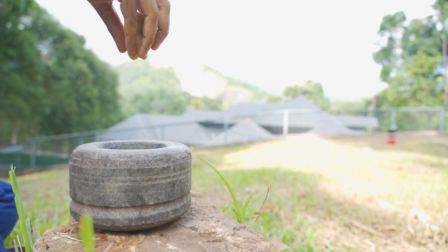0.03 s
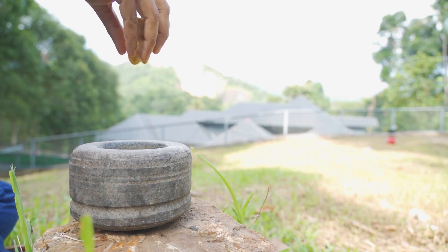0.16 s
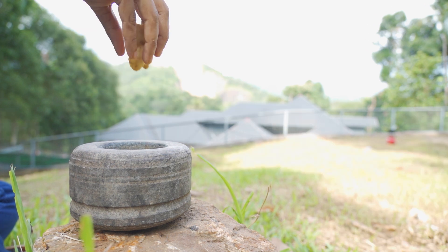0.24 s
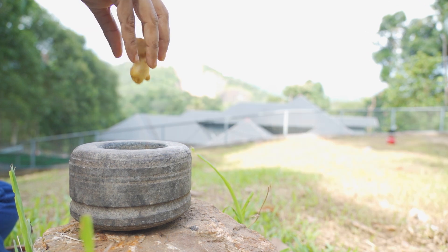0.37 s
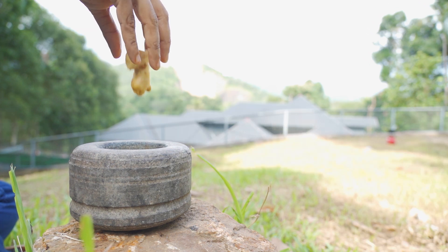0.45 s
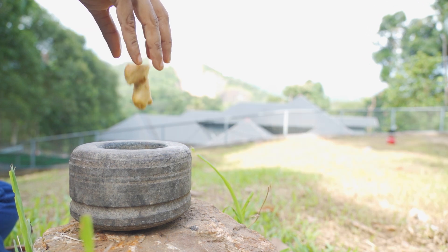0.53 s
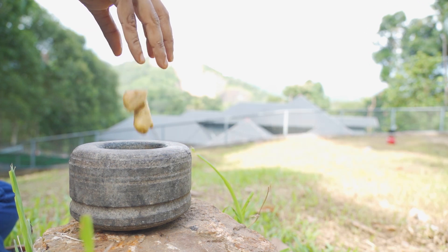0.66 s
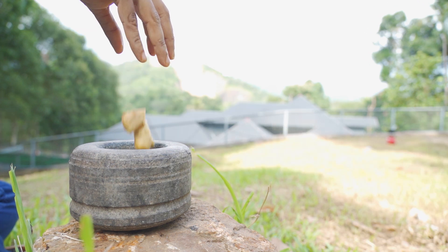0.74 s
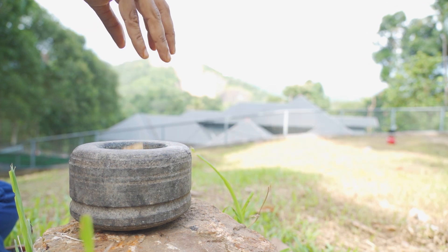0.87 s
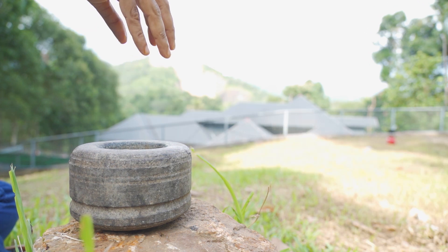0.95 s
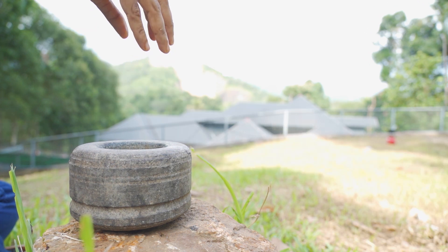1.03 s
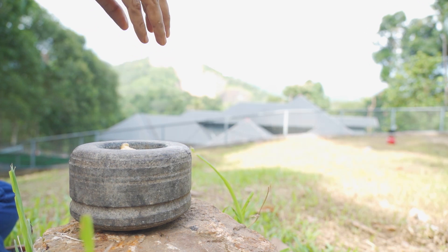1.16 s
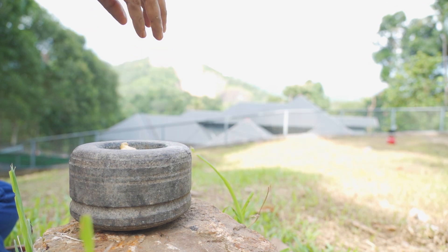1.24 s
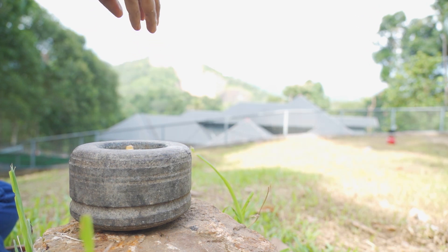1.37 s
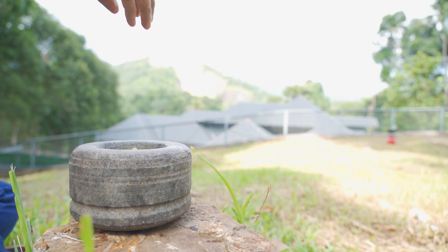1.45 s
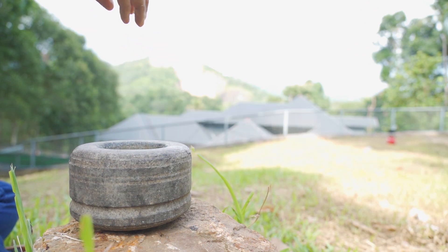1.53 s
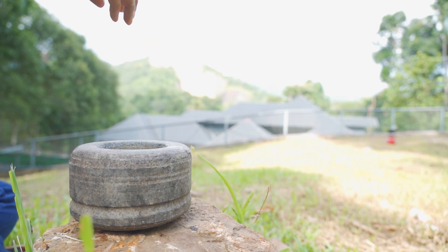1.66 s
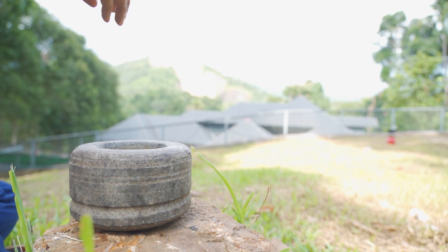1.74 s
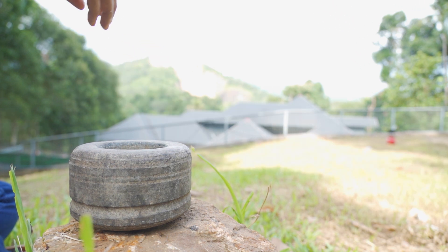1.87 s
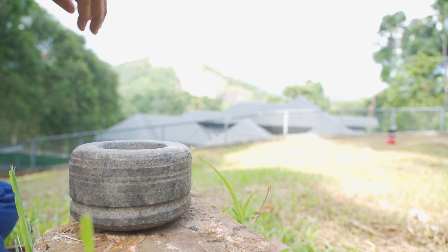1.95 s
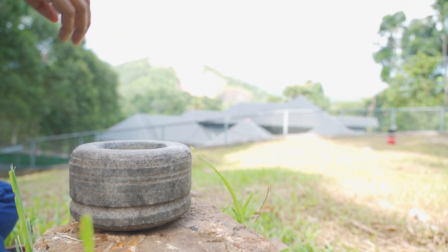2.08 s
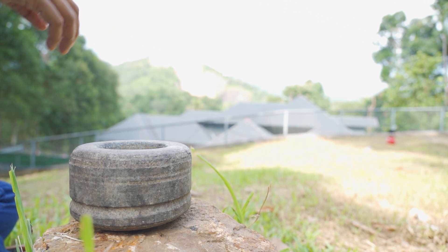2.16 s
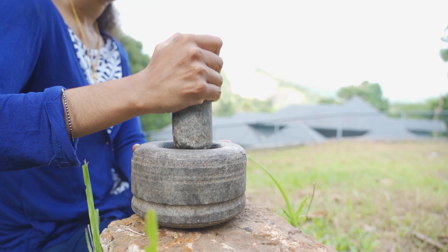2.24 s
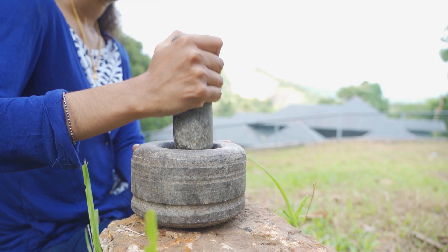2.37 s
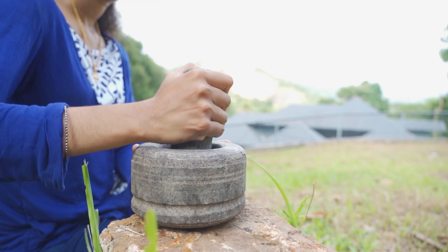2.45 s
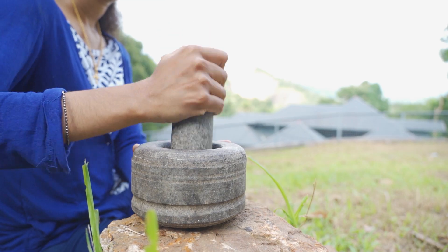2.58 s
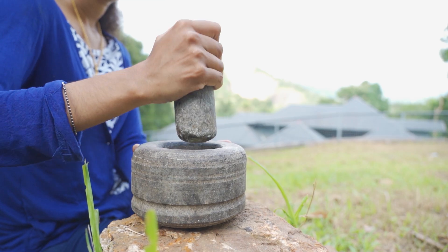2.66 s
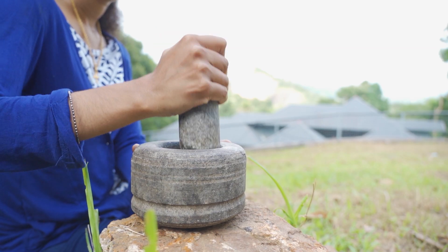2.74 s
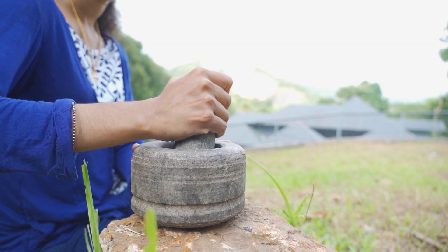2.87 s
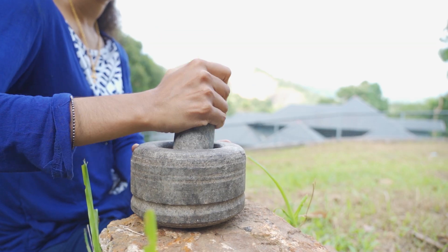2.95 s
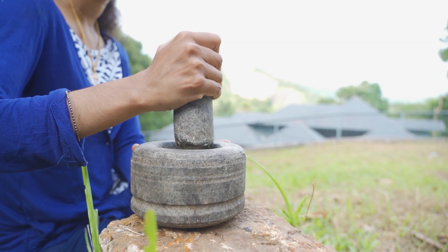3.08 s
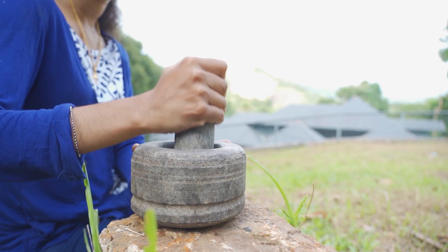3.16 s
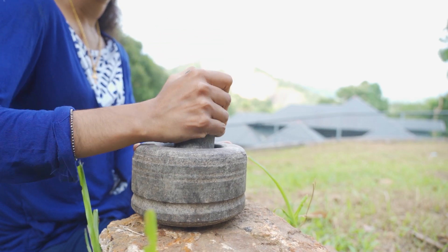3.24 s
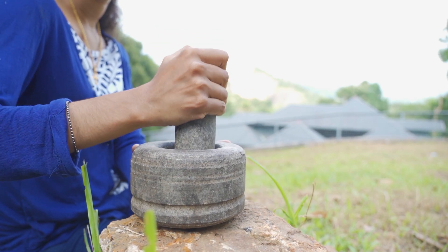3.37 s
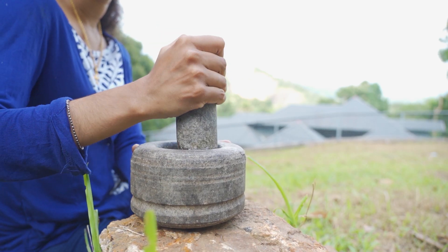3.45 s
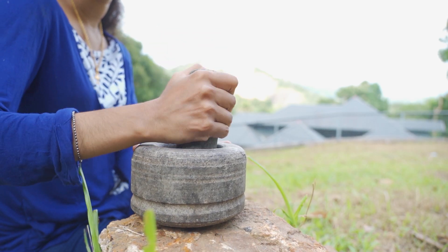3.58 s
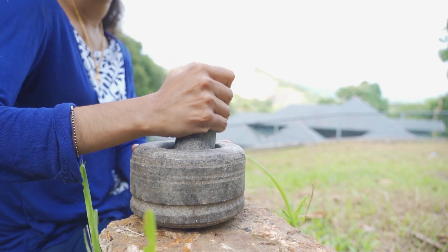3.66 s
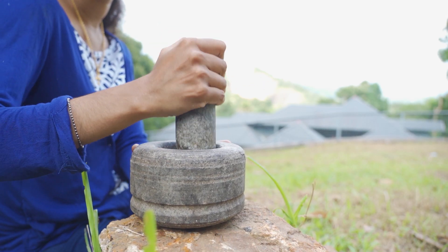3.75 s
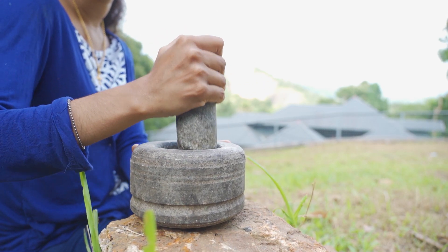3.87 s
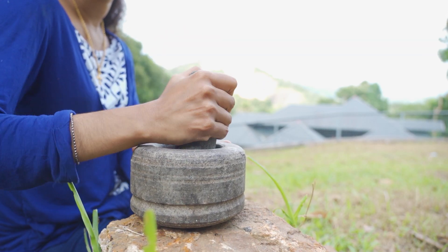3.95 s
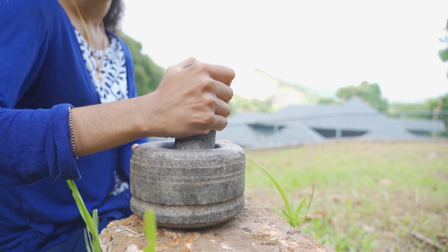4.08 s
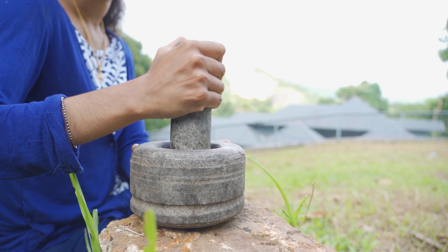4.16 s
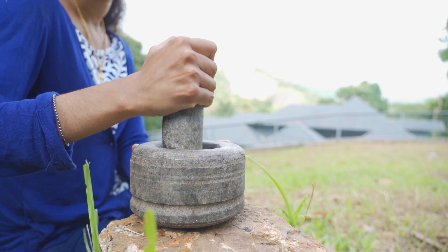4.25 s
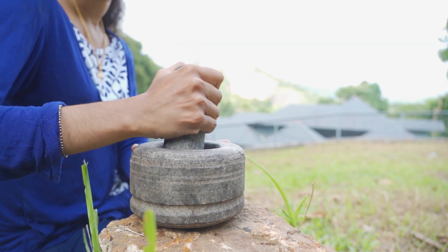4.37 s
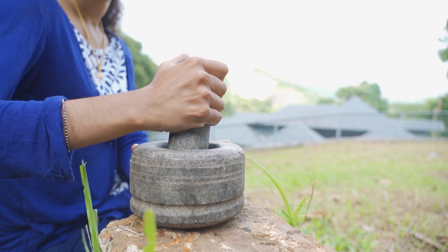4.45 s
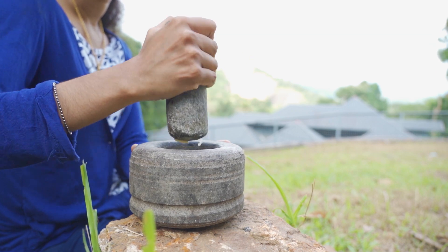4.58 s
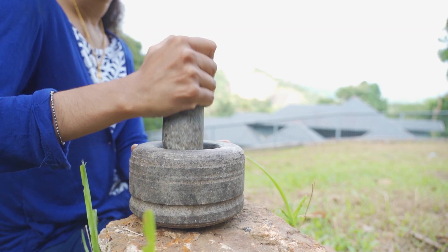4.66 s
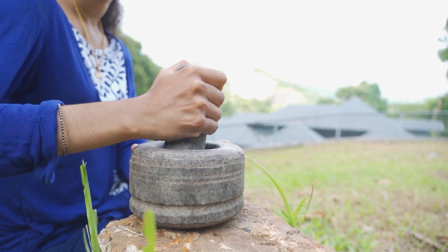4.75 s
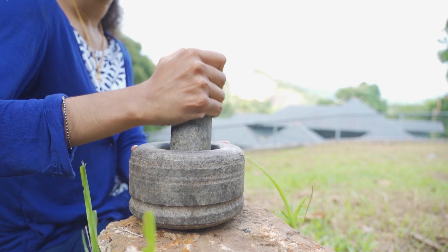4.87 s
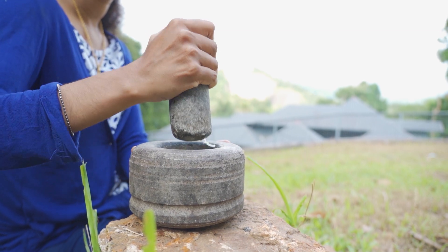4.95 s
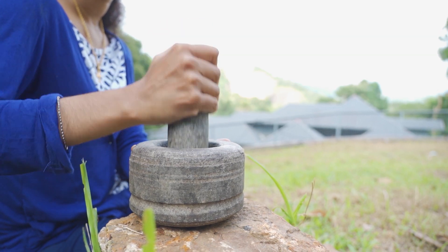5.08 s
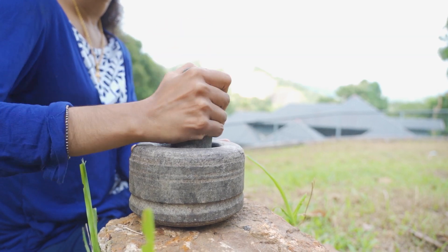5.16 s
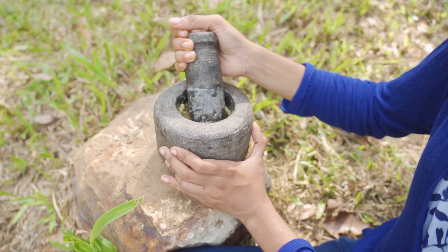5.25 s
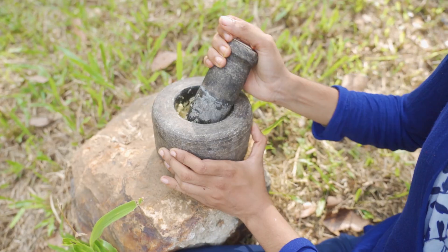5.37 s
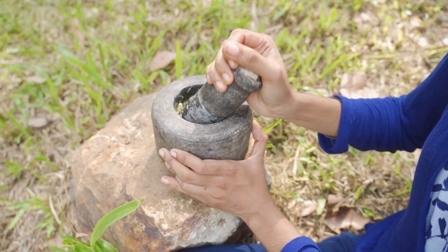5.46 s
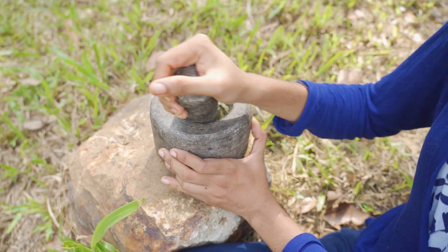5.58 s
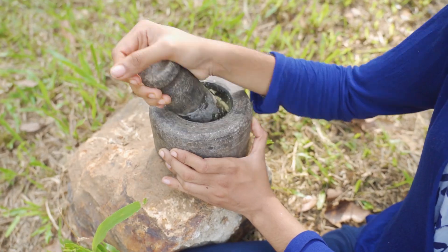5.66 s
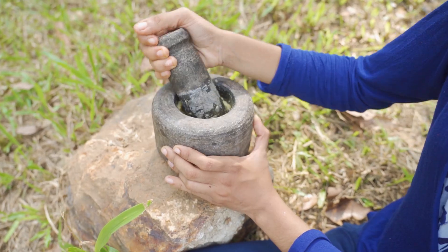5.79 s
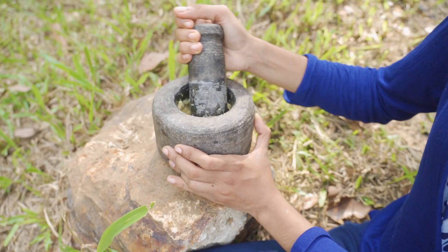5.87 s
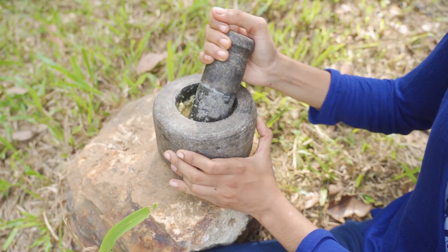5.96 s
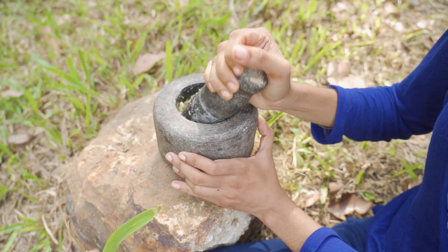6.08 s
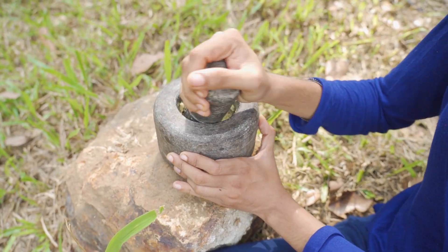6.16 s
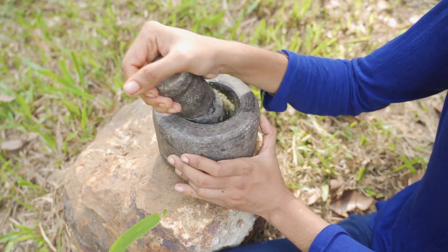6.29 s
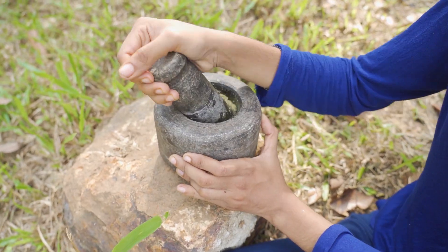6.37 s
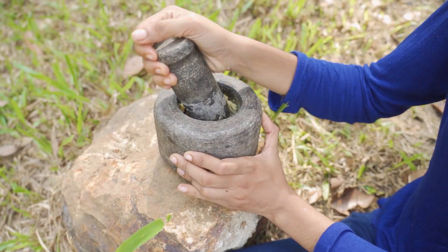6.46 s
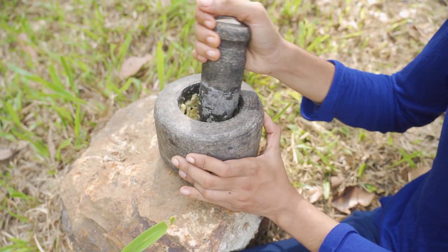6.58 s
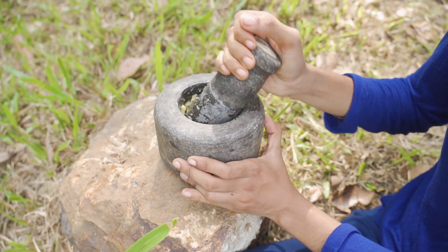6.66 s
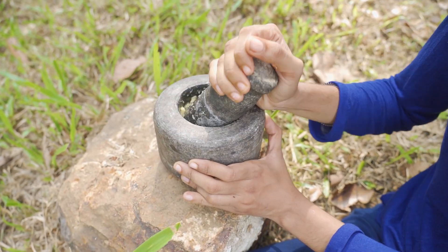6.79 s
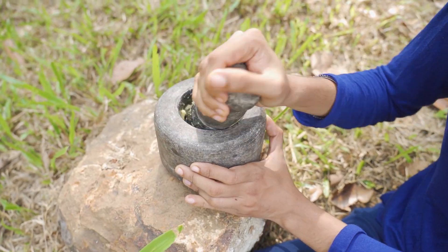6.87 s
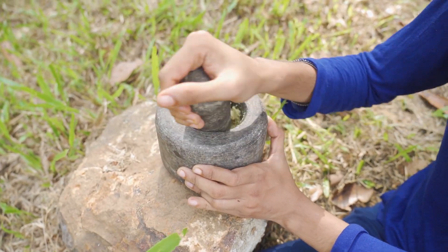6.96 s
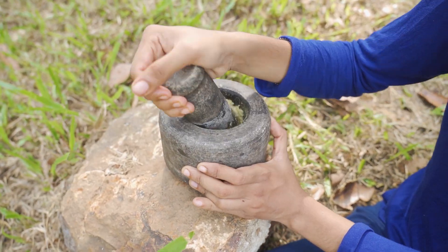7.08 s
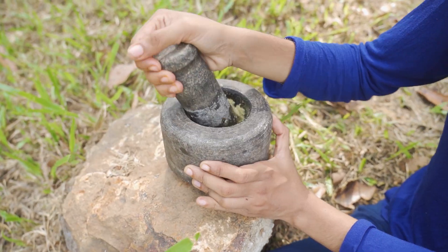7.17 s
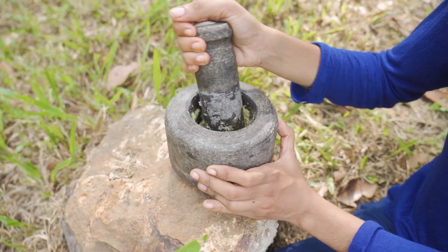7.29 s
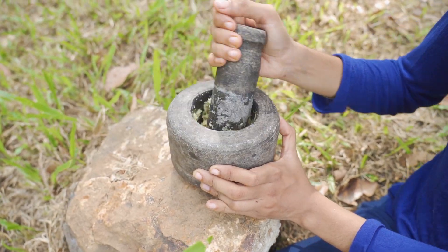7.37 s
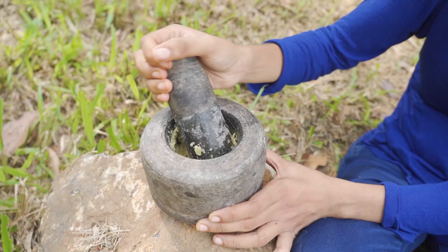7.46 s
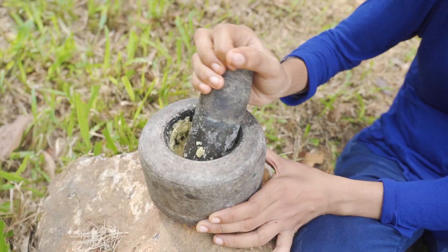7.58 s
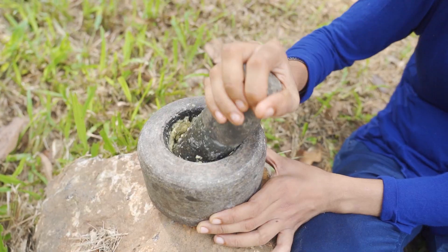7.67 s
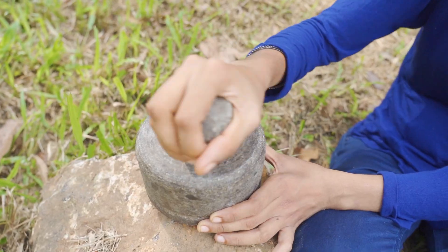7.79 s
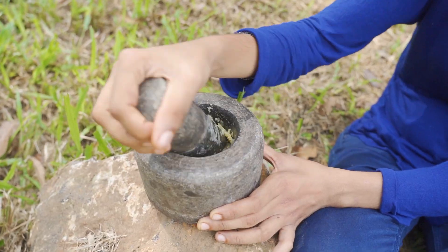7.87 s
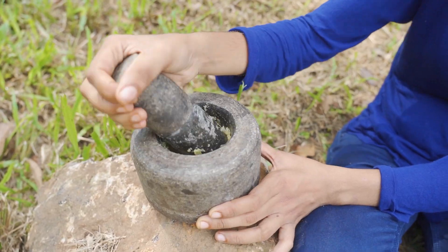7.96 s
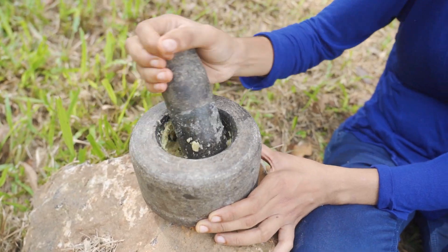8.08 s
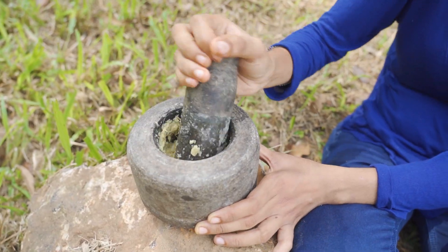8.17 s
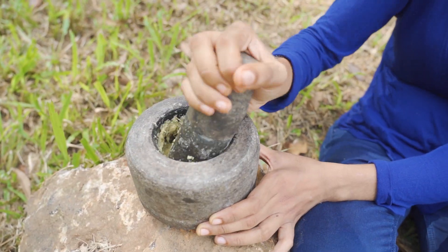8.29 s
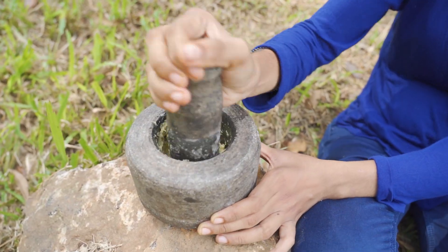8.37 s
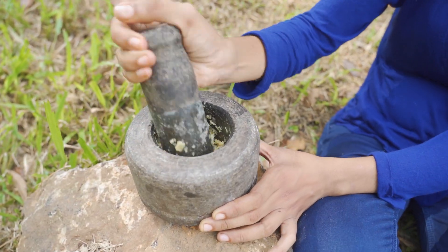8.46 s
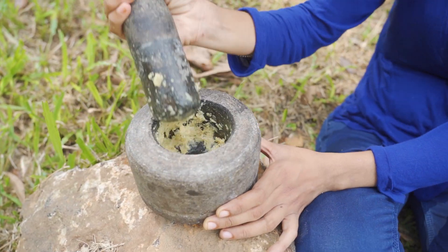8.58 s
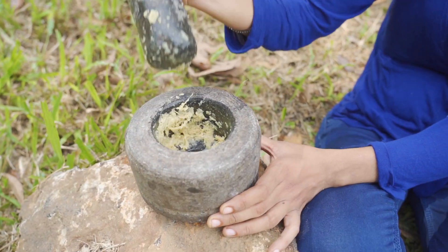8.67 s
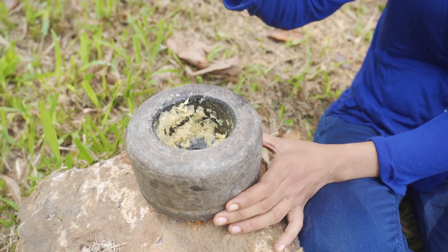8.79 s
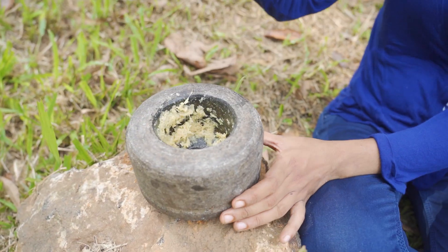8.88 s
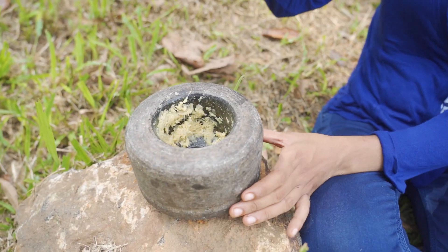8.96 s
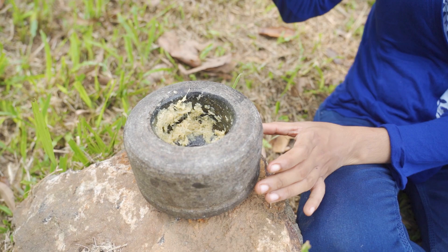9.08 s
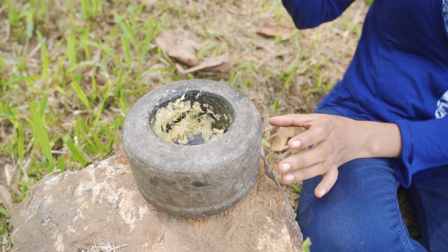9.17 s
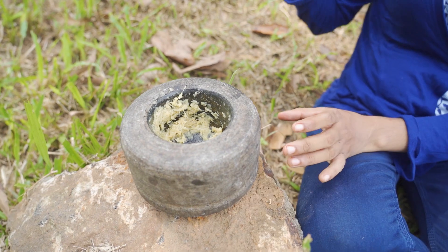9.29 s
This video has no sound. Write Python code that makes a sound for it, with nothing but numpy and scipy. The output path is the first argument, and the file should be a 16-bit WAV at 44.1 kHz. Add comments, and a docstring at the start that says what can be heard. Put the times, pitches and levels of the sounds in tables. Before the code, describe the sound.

Low, dull, faint wind opens outdoors, with a barely audible thin whine. At about 1.05 s a piece of ginger lands in a stone mortar: a soft low thud, a second bump at 1.1, tiny settling taps until 1.25. At 2.3 s the air abruptly becomes brighter and hissier. A stone pestle pounds at about 2.5, 2.9, 3.25, 3.6, 4.0, 4.35, 4.8 and 5.2 s: crisp bursts of snapping fibres, juicy crackle and low rocking thumps; 4.35 is the hardest, brightest stone clack. From 5.3 to 8.5 s the pestle grinds in short uneven sweeps, gritty rubbing with wet squelch, pops and hollow knocks, strong clacks at 5.88, 6.67 and 6.77. Scraping thins out; a small wet tick near 8.6, then light breeze and rustle to about 9.3. Close microphone, dry, only a faint tail.

```python
"""Faint low wind outdoors; a piece of ginger drops into a stone mortar and settles, and the air turns to a brighter hiss.
A stone pestle then pounds it eight times and grinds the paste.
Each blow is a burst of snapping fibres (filtered clicks), juice crackle and a low thump of the rocking mortar.
Bare stone on stone is a wavelet through the bowl's resonances, with a high decaying ring and cracking grit.
Grinding is dense clicks shaped by sweep pressure, with stone ring, wet squelch and small skips."""
import sys
import numpy as np
from scipy import signal
from scipy.fft import rfft, irfft
from scipy.io import wavfile

SR = 44100
rng = np.random.default_rng(int(sys.argv[2]) if len(sys.argv) > 2 else 0)


def file_out(sig):
    """Save sig as 16-bit WAV at sys.argv[1]."""
    # one column per channel
    cols = np.atleast_2d(sig).T
    # limit, then scale
    lim = np.clip(cols, -1, 1)
    pcm = np.round(lim * 32767).astype(np.int16)
    wavfile.write(sys.argv[1], SR, pcm)


N = 411453
TIME = np.arange(N) / SR

# Ringing of the stone. Each row: frequency in Hz, decay time t60 in s, level in dB.
STONE = [(7215, 0.062, 2), (8890, 0.023, 0)]
# Spectrum of cracking fibres and grit. Each row: frequency in Hz, level in dB.
CRUNCH = [(200, -19.5), (700, -6), (1600, -3), (2300, -2), (4500, 3), (8000, -2), (11000, -10.5),
          (16000, -25)]
# Spectrum of juice. Each row: frequency in Hz, level in dB.
WET = [(1500, -32), (3000, -5), (4200, 1.5), (5000, -3.5), (5900, -4.5), (7500, -5.5), (10000, -9.5),
       (15000, -30)]
# Sweeps of the pestle round the bowl. Each row: start in s, length in s, pressure in dB,
# bare-stone bite relative to pressure in dB, fall of the bite in dB/s (negative rises).
STROKES = [(5.276, .3, -43, -2.5, 13), (5.603, 0.25, -47, -12, 4), (5.885, .27, -43.5, -5, -10),
           (6.195, .14, -49.5, -16, 10), (6.434, 0.019, -44, -11, 10), (6.673, 0.091, -43.5, -2, 0),
           (6.894, 0.18, -49.5, -11.5, 27), (7.188, 0.049, -56, 3.5, 12), (7.374, 0.32, -44.5, -3, 28),
           (7.742, .17, -48.5, -8.5, 1), (7.965, .1, -45.5, -11.5, 0), (8.098, .2, -49.5, -5, -7),
           (8.323, .06, -64, -2, 10), (8.469, 0.054, -50, -5.5, 30)]


def amp(db):
    """Decibels to gain."""
    return 10 ** (np.asarray(db) / 20)


def unit(x):
    """Scale to rms 1."""
    return x / np.sqrt(np.mean(x ** 2) + 1e-20)


def curve(table):
    """Each column of a table, joined by straight lines in time."""
    s, *columns = np.transpose(table)
    return [np.interp(TIME, s, c) for c in columns]


def between(start_s, end_s, fade_s=0.0035):
    """One from start to end, with linear fades inside both ends."""
    fade_in = np.clip((TIME - start_s) / fade_s, 0, 1)
    fade_out = np.clip((end_s - TIME) / fade_s, 0, 1)
    return fade_in * fade_out


def add(out, s, x):
    """Mix a short sound in at time s."""
    i = max(int(round(s * SR)), 0)
    out[i:i + len(x)] += x[:N - i]


def band(x, hz, width_hz):
    """One resonance, gain 1 at its centre."""
    b, a = signal.iirpeak(min(hz, SR / 2 - 1000), hz / width_hz, fs=SR)
    return signal.lfilter(b, a, x)


def colour(x, points, shift=1, size=4096):
    """Minimum-phase filter through (Hz, dB) points, moved in pitch by shift."""
    hz, db = np.transpose(points)
    f = np.maximum(np.arange(size // 2 + 1) * SR / size, 1)
    gain = amp(np.interp(np.log(f), np.log(hz * shift), db))
    # folding the cepstrum makes the filter causal
    cepstrum = irfft(np.log(gain))
    cepstrum[1:size // 2] *= 2
    cepstrum[size // 2 + 1:] = 0
    impulse = irfft(np.exp(rfft(cepstrum)))
    return signal.fftconvolve(x, impulse)[:len(x)]


def walk(rate_hz):
    """Random wander: normal knots, rate_hz a second, joined by straight lines."""
    knots = rng.standard_normal(4096)
    return np.interp(TIME * rate_hz, np.arange(len(knots)), knots)


def clicks(count, rate_hz, spread_db):
    """Random single-sample impulses, rate_hz a second, of uneven size and sign."""
    size = amp(spread_db * np.minimum(rng.exponential(size=count), 4))
    return (rng.random(count) < rate_hz / SR) * size * rng.choice([-1, 1], count)


def whines(flutter=1.07, fade_db=2):
    """Faint thin sines whose pitch and strength waver."""
    # Each row: start in s, end in s, centre in Hz, level in dB, waver depth in Hz.
    tones = [(0, 2.4, 1736, -80, 28), (0, 2.32, 3594, -83.5, 8.5), (2.32, 5.25, 8700, -81, 90),
             (7.0, 8.95, 10200, -88, 47.5)]
    out = np.zeros(N)
    for start, end, hz, db, waver_hz in tones:
        pitch_hz = hz + waver_hz * (walk(1.7) + flutter * walk(200))
        level = amp(db + fade_db * walk(13))
        tone = unit(np.sin(2 * np.pi * np.cumsum(pitch_hz) / SR))
        out += level * tone * between(start, end)
    return out


def air(wind_db=-49, hiss_db=-53.5, turn_s=2.325):
    """Filtered noise: low wind under a dull hiss, then open air with a light rustle."""
    # Early wind spectrum. Each row: frequency in Hz, level in dB.
    wind_spectrum = [(12, -33.5), (20, -0.5), (66, -7), (109, -19), (207, -16.5), (485, -27), (1190, -35),
                     (1630, -46), (1750, -40.5), (2410, -47.5), (3730, -46), (4800, -51.5), (6240, -118),
                     (10600, -120)]
    # Later open-air spectrum. Each row: frequency in Hz, level in dB.
    hiss_spectrum = [(15, -45), (25, -37), (49, -4), (84, -6.5), (105, -3.5), (127, -0.5), (344, -10.5),
                     (394, -13), (476, -17), (818, -15.5), (1740, -21), (5140, -27.5), (8140, -37),
                     (14800, -45), (16000, -44)]
    # The breeze. Each row: time in s, low swell in dB, rustle in dB.
    breeze = [(2.3, 0.5, 0.5), (3.3, 1.5, 1.5), (4.2, -0.5, 1.5), (5.1, 0, 1), (6.55, 3.5, 3),
              (7.5, -1.5, 4), (8.7, 2, 2.5), (9.0, 3.5, 2.5), (9.25, 1.5, 5)]
    dull = signal.ellip(8, .2, 70, 4750, fs=SR, output="sos")
    wind = signal.sosfilt(dull, unit(colour(rng.standard_normal(N), wind_spectrum)))
    wind = wind * amp(wind_db + 0.4 * walk(8.6))
    swell_db, rustle_db = curve(breeze)
    hiss = amp(hiss_db) * unit(colour(rng.standard_normal(N), hiss_spectrum))
    # below and above 600 Hz swell separately
    low = signal.sosfilt(signal.butter(1, 600, fs=SR, output="sos"), hiss)
    swell = low * amp(swell_db + 0.59 * walk(4.8))
    rustle = (hiss - low) * amp(rustle_db + 0.61 * walk(4.5))
    early = wind * between(0, turn_s + 0.0027)
    late = (swell + rustle) * between(turn_s, 10)
    return early + late + whines()


def surroundings(x, near_db=-17, near_s=0.005, far_db=-36, far_s=0.089, count=8000):
    """Rock and hands scatter the sound at once; the field returns only a faint tail."""
    t = np.arange(count) / SR

    def tail(decay_s):
        return unit(rng.standard_normal(count) * (t > .001) * np.exp(-t / decay_s)) / np.sqrt(count)

    near = amp(near_db) * tail(near_s)
    far = amp(far_db) * tail(far_s)
    return x + signal.fftconvolve(x, near + far)[:N]


def drops(decay_s=0.006, count=4000):
    """The soft root lands, rolls and settles: low sine thuds with dull noise slaps."""
    # Each row: time in s, thud in dB, pitch in Hz, slap in dB.
    landings = [(1.057, -33.5, 121, -35.5), (1.102, -38, 55, -56), (1.155, -54, 170, -52),
                (1.19, -54, 140, -51), (1.239, -48, 150, -45)]
    # Slap spectrum. Each row: frequency in Hz, level in dB.
    slap_spectrum = [(100, -8), (200, 10.5), (280, 8), (420, -15), (700, -6), (1200, -12), (2200, -32),
                     (4300, -35), (5200, -72)]
    out, t = np.zeros(N), np.arange(count) / SR
    for s, db, hz, slap_db in landings:
        swell = t / decay_s * np.exp(1 - t / decay_s)
        thud = amp(db) * np.sin(2 * np.pi * hz * t)
        slap = amp(slap_db) * unit(colour(rng.standard_normal(count), slap_spectrum))
        add(out, s - .005, swell ** 2 * (thud + slap))
    return out


def pops(pop_db=1, tone_db=6, count=3000):
    """Pockets of juice burst, each a tight cluster of ticks around its own pitch."""
    # Each row: start in s, peak before pop_db in dB, pitch in Hz, decay in s.
    bursts = [(3.355, -43, 3460, .0025), (3.6476, -36, 3280, .003), (4.0327, -37, 4660, .003),
              (5.5536, -28, 4380, 0.0036), (5.685, -42.5, 4500, .015), (6.1497, -31.5, 6500, 0.0076),
              (6.2233, -34.5, 7600, .003), (6.764, -28, 2880, 0.0022), (6.7945, -35.5, 3150, 0.0024),
              (6.8321, -38, 3600, 0.0032), (6.94, -41.5, 3960, .02), (7.7477, -40, 4180, 0.0045),
              (7.7825, -34.5, 3980, .004), (7.8084, -36.5, 4330, .004), (8.5793, -41, 7540, .002)]
    out, t = np.zeros(N), np.arange(count) / SR
    for s, db, hz, decay_s in bursts:
        ticks = colour(clicks(count, 8000, 4.6) * np.exp(-t / decay_s), WET)
        ticks = band(ticks, hz, 8100)
        ticks = ticks + amp(tone_db) * band(ticks, hz, 660)
        add(out, s, amp(db + pop_db) * ticks / np.max(abs(ticks)))
    return out


def squelch(burst_db=3, count=9):
    """Wet pockets of many sizes, each crackling at its own pitch in short bursts."""
    pockets = np.zeros(N)
    for hz in np.geomspace(2900, 12000, count):
        crackle = band(band(clicks(N, 500, 2.8), hz, hz / 4), hz, hz / 4)
        pockets += crackle * amp(4.5 * walk(55)) / np.sqrt(hz)
    return unit(colour(pockets, WET) * amp(burst_db * walk(45)))


def bowl(x, tuning=1, low_hz=660, high_hz=3200):
    """Hollow answer of the mortar; the place of the pestle shifts its pitch."""
    # Bowl with the pestle inside. Each row: frequency at tuning 1 in Hz, width in Hz, level in dB.
    resonances = [(1170, 89, -2.5), (1234, 152, -2), (1493, 100, -14), (2147, 230, -9), (2830, 140, -12)]
    modes = sum(amp(db) * band(x, hz * tuning, width) for hz, width, db in resonances)
    # the small mouth radiates little outside the range of its resonances
    mouth = signal.butter(2, [low_hz, high_hz], "band", fs=SR, output="sos")
    return signal.sosfilt(mouth, modes)


def tock(t, hz, bowl_db, tuning, lag_hz=1200, lag_width_hz=600):
    """A brief push radiates as one wavelet and fills the bowl."""
    u = np.pi * hz * t
    push = (1 - 2 * u ** 2) * np.exp(-u ** 2)
    sound = push + amp(bowl_db) * bowl(push, tuning)
    # all-pass: the hollow tone leaves the bowl a little late
    return sound - 2 * band(sound, lag_hz, lag_width_hz)


def sweeps(attack_s=0.011, ease_db_per_s=6, release_s=.018, resting_db=-63.5):
    """Pestle pressure and bare-stone bite: quick attack, easing, release; smearing paste alters the bite."""
    # between sweeps the pestle still slides lightly
    resting = amp(resting_db) * between(STROKES[0][0], STROKES[-1][0], 0.18)
    pressure, bite = resting, resting / 2
    for start, length, db, bare_db, smear_db_per_s in STROKES:
        age = np.maximum(TIME - start, 0)
        attack = np.minimum(age / attack_s, 1)
        release = np.exp(-np.maximum(age - length, 0) / release_s)
        age = np.minimum(age, length)
        force = attack * release * amp(db - ease_db_per_s * age)
        pressure = pressure + force
        bite = bite + force * amp(bare_db - smear_db_per_s * age)
    return pressure, bite


def skips(pressure, rate_hz=14, skip_db=13, skip_hz=990, bowl_db=8, scatter_db=2.0, scatter=.13, count=1500):
    """The pestle skips over lumps: small uneven knocks that scale with its pressure."""
    out, t = np.zeros(N), np.arange(count) / SR - .0015
    times = np.arange(STROKES[0][0], STROKES[-1][0], 1 / rate_hz)
    scatters = np.clip(rng.standard_normal((128, 3)), -2, 2)
    for s, (late, size, pitch) in zip(times, scatters):
        s = s + late / rate_hz / 2
        level = pressure[int(s * SR)] * amp(skip_db + scatter_db * size)
        add(out, s, level * tock(t, skip_hz * np.exp(scatter * pitch), bowl_db, 1))
    return out


def grinding(rub_db=-0.5, bite_db=0, bowl_db=8, wander=.055):
    """The pestle catches and slips over the grain: dense tiny knocks in the same bowl and stone."""
    # Dull rub of the grain. Each row: frequency in Hz, level in dB.
    grain_spectrum = [(60, -8.5), (125, 0), (220, -4.5), (400, -2.5), (750, -1), (1300, -7.5),
                      (1650, -13.5), (2300, -37), (4000, -44)]
    # Bare stone scraping on stone. Each row: frequency in Hz, level in dB.
    bite_spectrum = [(600, -46), (1400, -2.5), (2100, 7), (2600, -3), (3200, -11.5), (5000, -39)]
    ring_db, ring_slope = -17, 0.85  # level at bite 1, dB per dB of bite
    wet_db, wet_slope = -41.5, .42  # level at pressure 1, dB per dB of pressure
    pressure, bare = sweeps()
    catch = amp(3.2 * walk(70))
    # fine sliding, broken by coarser slips
    slips = unit(clicks(N, 2500, 2.5) * catch) + unit(clicks(N, 90, 2))
    # paste cushions the grain into a dull rub; where it thins, bare stone bites
    grain = colour(slips, grain_spectrum)
    rub = unit(grain + amp(bowl_db) * bowl(grain))
    bite = unit(colour(clicks(N, 2000, 3.4) * catch, bite_spectrum))
    # the circling pestle changes the hollow, so its pitch wanders
    warped = TIME + np.cumsum(wander * walk(14)) / SR
    rub = np.interp(warped, TIME, rub)
    bite = np.interp(warped, TIME, bite)
    # each ring of the stone swells and fades as the contact point moves
    ring = np.zeros(N)
    for hz, t60, db in STONE:
        swell = amp(db + 3 * walk(16))
        ring += swell * band(clicks(N, 2500, 2) * catch, hz, 3 / t60) * np.sqrt(t60)
    stone = amp(rub_db) * pressure * rub + amp(bite_db) * bare * bite
    stone = stone + amp(ring_db) * bare ** ring_slope * unit(ring)
    wet = amp(wet_db) * pressure ** wet_slope * squelch()
    return stone + wet + skips(pressure)


def knocks(lead_s=0.0013, grit_s=0.0012, count=6000):
    """Stone meets stone: a knock in the bowl, whose strength sets the stone's ring and cracking grit."""
    # Each row: time in s, push in dB, contact pitch in Hz, bowl resonance in dB, bowl tuning ratio.
    contacts = [(2.4557, -12, 1060, 2, 1.22), (2.845, -19, 1190, 3, 0.82), (3.2228, -24, 890, 1, 1.23),
                (3.2392, -28, 1130, 3, 1), (3.249, -23, 1230, -14, 1.4), (3.2564, -28, 1260, -17, 1.2),
                (4.0037, -10.5, 1180, 1.5, 0.97), (4.3553, 2, 2070, 1, 1.17),
                (4.3776, -0.7, 1910, -7, 1.17), (5.2813, -22.5, 960, 10, 1.06),
                (5.3603, -19.5, 1054, -2, 0.95), (5.4428, -19, 1420, -2, 1.5), (5.6063, -25, 920, 9.5, .99),
                (5.6587, -23, 900, 3, 1.03), (5.7812, -27.5, 1010, 21, 1.01), (5.812, -25.5, 875, 7, 1.06),
                (5.878, 3, 1550, .5, 1), (5.8939, -6.5, 1210, 1.5, 1.02), (5.9237, -18, 856, 7.5, 1),
                (6.6661, -3, 2140, 11.5, 1.14), (6.7663, -5.5, 1440, 8, 1),
                (6.8405, -13.5, 1350, 6.5, 1.01), (7.2803, -24, 950, 3, 1), (7.518, -11, 1710, 20.5, 1.1),
                (7.6264, -25, 1290, 8.5, 1.1), (7.6649, -19, 1440, 10.5, 1.06),
                (7.737, -19.5, 1100, 1, .97), (7.874, -28.5, 1030, 9.5, 1.14),
                (8.2178, -30.5, 1230, 11.5, 1)]
    ring_at_0_db, ring_per_push = -39.5, 0.27  # dB at a 0 dB push, dB per dB
    grit_at_0_db, grit_per_push = -31, .45
    # a hand then steadies the mortar: the ring is damped, grit is slightly louder
    held_s, held_ring_db, held_grit_db = 5.25, -11, 0.5
    out, t = np.zeros(N), np.arange(count) / SR - lead_s
    after = np.maximum(t, 0)
    ring = sum(amp(g - 60 * after / t60) * np.sin(2 * np.pi * f * after) for f, t60, g in STONE)
    for s, db, hz, bowl_db, tuning in contacts:
        held = s > held_s
        ring_db = ring_at_0_db + ring_per_push * db + held_ring_db * held
        grit_db = grit_at_0_db + grit_per_push * db + held_grit_db * held
        grit = colour(rng.standard_normal(count) * (t > 0) * np.exp(-after / grit_s), CRUNCH)
        knock = amp(db) * tock(t, hz, bowl_db, tuning)
        add(out, s - lead_s, knock + amp(ring_db) * ring + amp(grit_db) * grit)
    return out


def gap(x, direct_db=-7, shift=0.08):
    """Crunches leave through the gap of pestle and wall, whose resonances change with each landing."""
    # Each row: mean frequency in Hz, width in Hz, level in dB.
    resonances = [(2240, 220, -7), (3200, 260, -4.5), (4610, 1100, -7.5), (7080, 390, -6)]
    tuning = np.exp(shift * rng.standard_normal(len(resonances)))
    modes = sum(amp(db) * band(x, hz * k, width) for (hz, width, db), k in zip(resonances, tuning))
    return amp(direct_db) * x + modes


def blows(lead_s=.008, touch=2.3, bottom_db=3, bottom_s=0.00019, squish_db=-28, squish_s=0.034,
          thump_hz=84, thump_s=0.049, rock_db=5, body_db=-3, count=13000):
    """Fibres snap in a dense burst, juice crackles after it, and the mortar rocks on its base."""
    # Each row: time in s, crunch level in dB, half length in s, brightness in Hz, thump in dB.
    strikes = [(2.5074, -20, 0.0021, 5230, -44), (2.874, -23.5, 0.0027, 4770, -47.5),
               (3.266, -21.5, 0.0026, 3900, -50), (3.6231, -23.5, 0.0025, 5200, -47),
               (4.0087, -18, 0.0018, 4930, -44.5), (4.3558, -18.5, 0.00022, 4800, -63),
               (4.391, -36.5, 0.0022, 4500, -52), (4.785, -25.5, 0.002, 4900, -41.5),
               (5.1926, -16.5, 0.0023, 5500, -43), (6.6657, -14, 0.00047, 4600, -62)]
    out, t = np.zeros(N), np.arange(count) / SR - lead_s
    after = np.maximum(t, 0)
    for s, db, half_s, hz, thump_db in strikes:
        # silent until the pestle touches; one sharp crack as it bottoms out
        burst = (t > -touch * half_s) / np.cosh(np.minimum(abs(t) / half_s, 20))
        crack = amp(bottom_db) * (t > 0) * np.exp(-after / bottom_s)
        snaps = gap(colour(clicks(count, 16000, 1.2) * (burst + crack), CRUNCH, hz / 5000))
        snaps = unit(snaps) * np.sqrt(np.mean(burst ** 2))
        juice = unit(colour(clicks(count, 1500, 5.7), CRUNCH)) * (t > 0) * np.exp(-after / squish_s)
        rock = np.sin(2 * np.pi * thump_hz * after)
        rock = rock * (1 - np.exp(-after / 0.011)) * np.exp(-after / thump_s)
        body = unit(band(band(rng.standard_normal(count), 324, 300), 290, 400))
        body = body * (t > 0) * np.exp(-after / 0.027)
        crunch = amp(db) * (snaps + amp(squish_db) * juice)
        thump = amp(thump_db) * (amp(rock_db) * rock + amp(body_db) * body)
        add(out, s - lead_s, crunch + thump)
    return out


def scene():
    """All the work at the mortar, in the open air."""
    work = drops() + knocks() + blows() + pops() + grinding()
    return (surroundings(work) + air())[None]


def record(dry, top_hz=16000):
    """Clip at full scale, then cut the top with a steep low-pass."""
    low_pass = signal.ellip(8, .2, 70, top_hz, fs=SR, output="sos")
    return signal.sosfilt(low_pass, np.clip(dry, -1, 1))


dry = scene()
out = record(dry)
file_out(out)
```